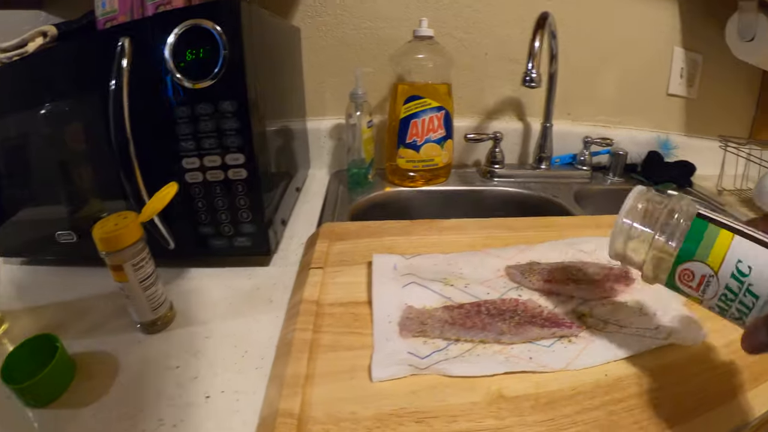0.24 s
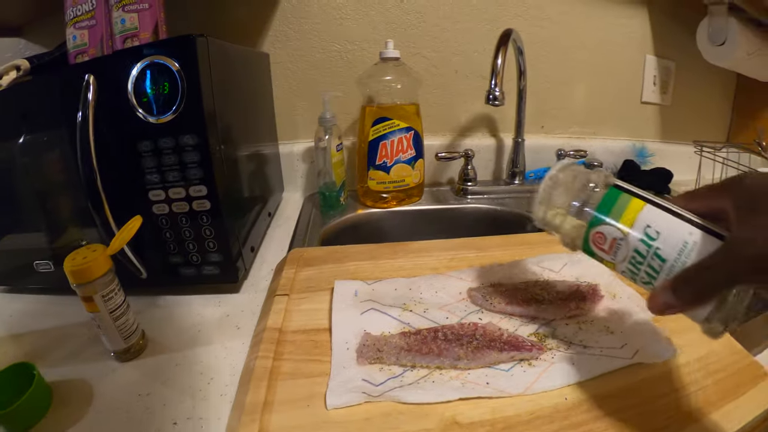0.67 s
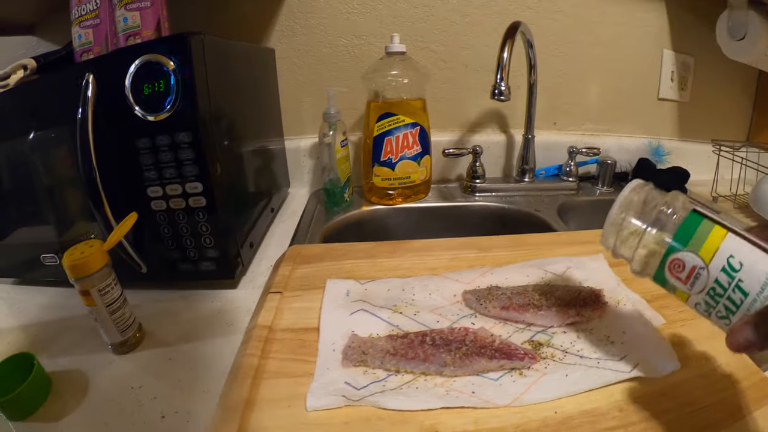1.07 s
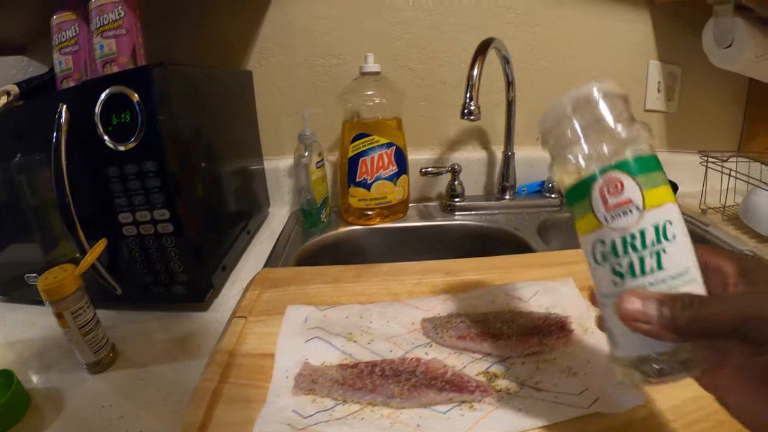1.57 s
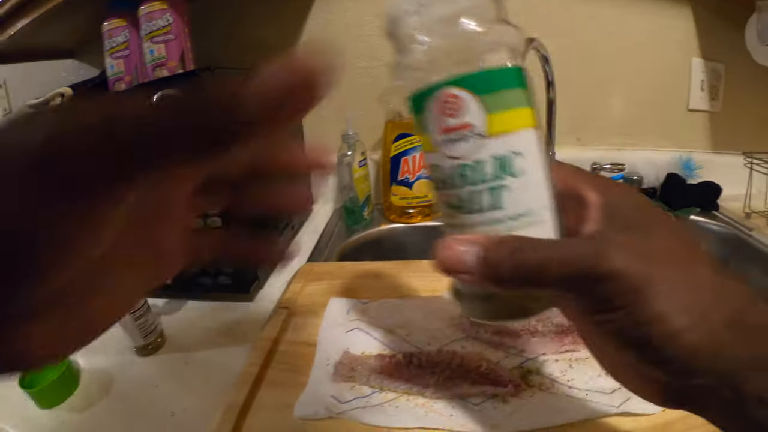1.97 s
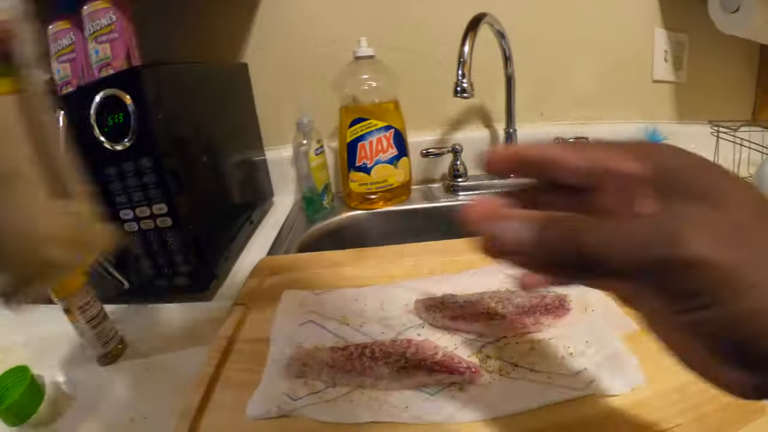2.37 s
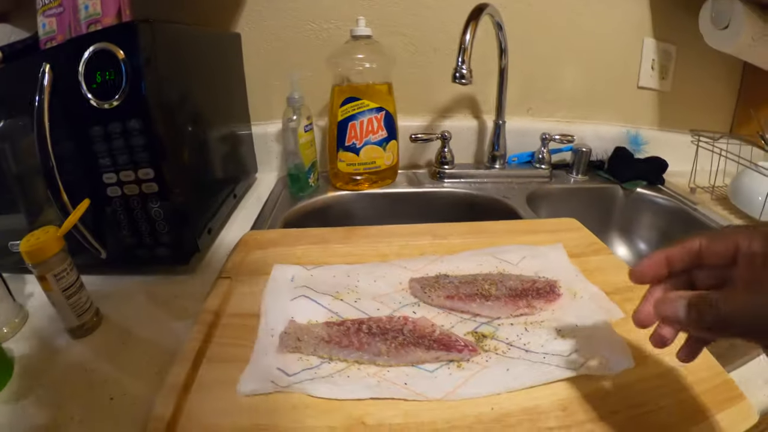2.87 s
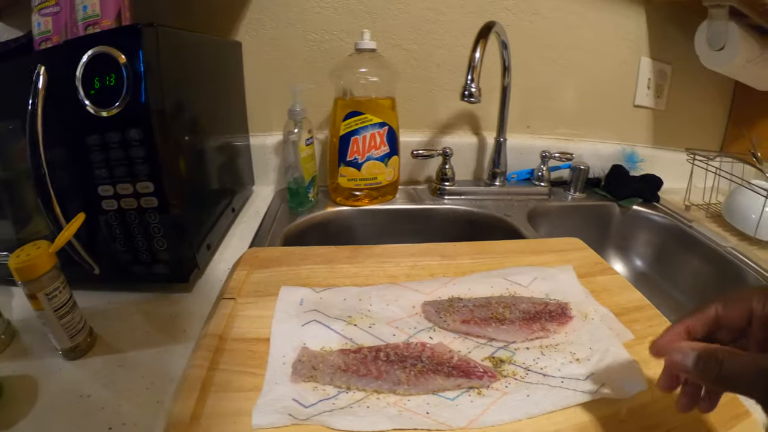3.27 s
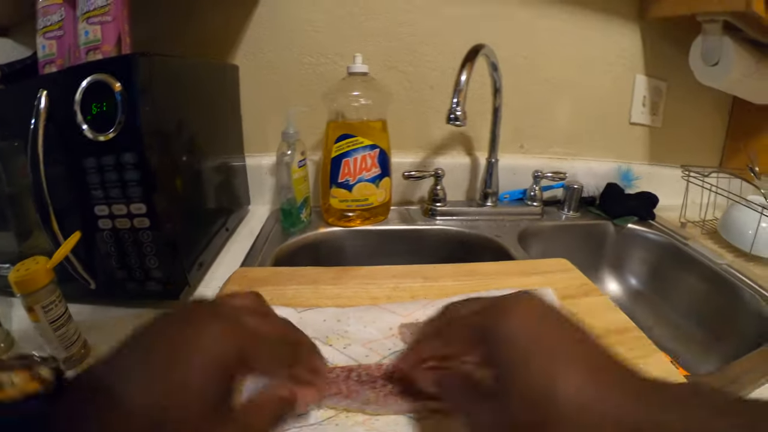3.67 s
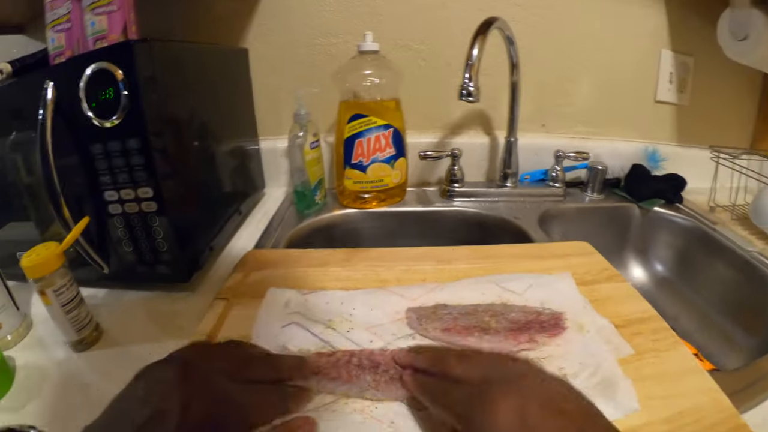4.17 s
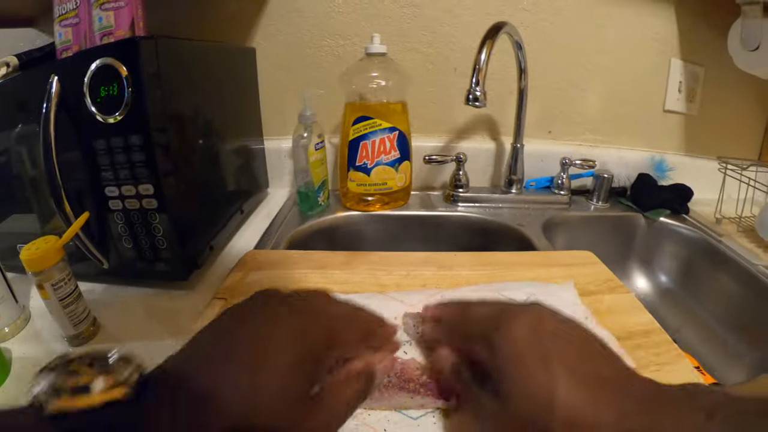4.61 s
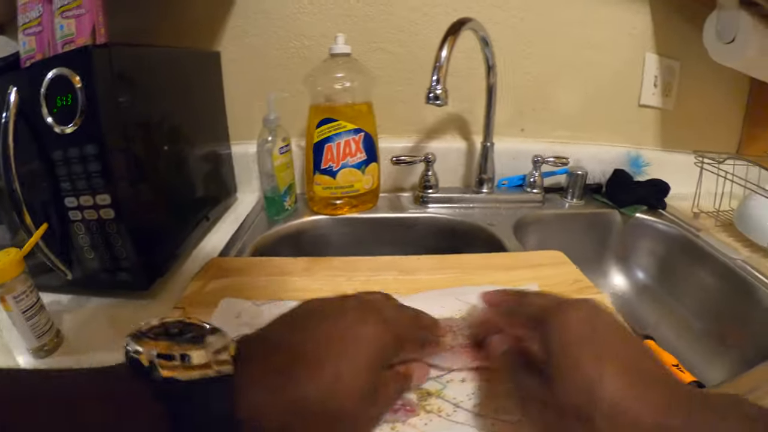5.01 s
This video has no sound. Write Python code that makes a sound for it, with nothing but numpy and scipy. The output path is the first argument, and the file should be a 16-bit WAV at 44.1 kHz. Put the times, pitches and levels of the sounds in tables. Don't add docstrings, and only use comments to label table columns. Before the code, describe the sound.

Salt is shaken in quick soft rattles inside a plastic jar, then a hard knock on the counter, faint rubbing and a wooden thud over low hum.

```python
import sys
import numpy as np
from scipy import signal
from scipy.fft import rfft, irfft
from scipy.io import wavfile
from scipy.ndimage import uniform_filter1d

SR = 44100
rng = np.random.default_rng(int(sys.argv[2]) if len(sys.argv) > 2 else 0)


def dump_mix(stems):
    frames = np.atleast_2d(stems).T
    limited = np.clip(frames, -1, 1)
    pcm = np.round(limited * 32767).astype(np.int16)
    wavfile.write(sys.argv[1], SR, pcm)


def invert_db(x):
    u = np.asarray(x, float) / 20
    return 10 ** u


N = 231436
HZ = np.maximum(np.arange(N // 2 + 1) * SR / N, 1.)
T = np.arange(N) / SR


def read(table):
    hz, value = np.transpose(table)
    return np.interp(np.log(HZ), np.log(hz), value)


def shape(x, gain):
    y = irfft(rfft(x, axis=-1) * gain, N, axis=-1)
    return y / np.sqrt(np.mean(y ** 2))


def colour(x, gain):
    return irfft(rfft(x) * gain / np.sqrt(np.mean(gain ** 2)), N)


def peaks(table):
    power = 0
    for hz, width, db in table:
        power = power + invert_db(2 * db) / (1 + (2 * (HZ - hz) / width) ** 2) ** 2
    return np.sqrt(power)


def pair(like, grain_db=0.):
    grain_size = np.minimum(rng.exponential(size=N), 4)
    mid, side = rng.standard_normal((2, N)) * invert_db(grain_db * grain_size)
    likeness = np.clip(read(like), -.99, .99)
    mid = rfft(mid) * np.sqrt(1 + likeness)
    side = rfft(side) * np.sqrt(1 - likeness)
    return irfft(np.array([mid + side, mid - side]), N) / 2


def pan(db):
    return invert_db(np.array([db, -db]) / 2)


def walk(rate):
    k = int(SR / rate)
    held = np.repeat(rng.standard_normal(N // k + 1), k)
    return 1.3 * uniform_filter1d(uniform_filter1d(held, k), k)[:N]


def wander(hz, spread_hz, rate):
    return np.sqrt(2) * np.sin(2 * np.pi * np.cumsum(hz + spread_hz * walk(rate)) / SR)


def swell(s, before, after, order=2):
    return np.exp(-((T - s) / np.where(T < s, before, after)) ** order)


def burst(s, t60):
    return (T >= s) * np.exp(-np.log(1000) * np.maximum(T - s, 0) / t60)


def ring(s, hz, t60, build=0.086):
    age = np.maximum(T - s, 0)
    decay = np.exp(-np.log(1000) * age / t60)
    return np.sin(2 * np.pi * hz * age) * decay * (1 - np.exp(-age * hz / build))


def convolve(x, response):
    return signal.fftconvolve(np.atleast_2d(x), np.atleast_2d(response), axes=-1)[:, :N]


def patchy(x, spread_db, rate):
    spectrum, out = rfft(x), 0
    place = np.clip(3 * np.log2(HZ / 2000), 0, 9)
    for k in range(10):
        band = irfft(spectrum * np.clip(1 - abs(place - k), 0, 1), N)
        out = out + band * invert_db(spread_db * walk(rate))
    return out


# frequency in Hz, then level in dB at the start, middle and end.
MOTOR_LINES = [(532, -80, -80, -73), (594, -66, -77, -76), (888, -73, -75, -76), (1540, -83, -83, -83),
               (5566, -90, -89, -101)]


def whine():
    out = 0
    for hz, *levels_db in MOTOR_LINES:
        level_db = np.interp(T, [0, T[-1] / 2, T[-1]], levels_db)
        out = out + invert_db(level_db) * wander(hz, 1., 3)
    return out


# peak in seconds, level in dB.
FLARES = [(.09, -60), (.23, -61), (.4, -57), (.53, -60.5), (.67, -56), (.79, -57.5), (1.15, -64),
          (1.33, -57.5), (1.45, -59), (1.86, -57), (1.99, -56.5), (2.2, -57), (2.42, -58.5), (2.63, -58),
          (2.82, -68), (3.31, -69), (3.45, -60.5), (3.9, -66), (4.38, -65), (4.7, -64), (4.85, -62),
          (5.11, -64)]


def whistle_level():
    flares = sum(invert_db(2 * db) * swell(s, 0.027, 0.027) for s, db in FLARES)
    rest_db, swing_db = -67, 2
    return np.sqrt(invert_db(2 * rest_db) + flares) * invert_db(swing_db * walk(21.97))


# frequency in Hz, level in dB per Hz.
AIR = [(15, -28), (25, -29.5), (106, -22.5), (167, -4.5), (219, -6), (293, -2.5), (427, -9.5), (573, -15),
       (691, -10.5), (1000, -23.5), (1500, -19), (2240, -37.5), (7090, -43.5), (10300, -55), (15000, -62)]
# frequency in Hz, likeness of left and right (-1 to 1).
AIR_LIKE = [(60, 0.9), (130, 0.49), (290, 1), (640, 0.33), (1400, -0.46), (3090, 0.64), (6800, -0.11),
            (15000, -0.19)]
# frequency in Hz, width in Hz, level in dB.
HUM_BANDS = [(58.9, 3.2, -64), (117.1, 4.3, -64.5), (146, 7, -68.5), (184.1, 3.8, -60), (254.9, 5.5, -61),
             (321.5, 18, -64), (371.4, 11, -62.5), (462, 15, -68), (510, 3.2, -73.5), (600, 52, -74.5)]
# peak in seconds, level in dB.
GUSTS = [(.33, -57), (.52, -53), (.7, -51.5), (1.22, -52), (1.39, -64), (1.6, -50), (1.86, -51.5),
         (2.02, -57.5), (2.2, -56.5), (2.34, -53), (2.64, -52.5), (2.82, -51.5), (3.154, -52),
         (3.35, -54.5), (3.6, -55), (3.96, -50), (4.12, -57.5), (4.48, -50.5), (4.89, -54.5),
         (5.146, -56.5), (5.25, -53.5)]


def hum():
    air = shape(pair(AIR_LIKE), invert_db(read(AIR))) * invert_db(-49 - 4.5 + 0.19 * walk(3.7))
    source = pair(AIR_LIKE)
    bands = sum(invert_db(db) * shape(source, peaks([(hz, width, 0)])) for hz, width, db in HUM_BANDS)
    gust_power = sum(invert_db(2 * db) * swell(s, 0.06, 0.06) for s, db in GUSTS)
    rest_db, low_hz, high_hz = -70.5, 294, 694
    low = np.sqrt(invert_db(2 * rest_db) + gust_power) * wander(low_hz, 8.93, 30)
    high = whistle_level() * wander(high_hz, 6.5, 30) * pan(-1.9)[:, None]
    return air + low + high + whine() + bands


# peak in seconds, level in dB,
# ring of the jar bottom in dB, ring of the jar wall in dB (both relative to the stroke).
STROKES = [(.076, -65, -7, -11), (.148, -63, -8, -15), (.227, -60, -0.5, -10), (.315, -53, -1, -3),
           (.389, -56.5, -7, -5), (.469, -59, -5, -4), (0.547, -57.5, -3, -2), (.621, -56, 3, -9),
           (0.693, -52, -6, -6), (.805, -68, -2, -5), (.942, -56, -4, -2.5), (1.008, -59.5, -1, -5),
           (1.095, -57.5, -9, -4), (1.173, -64, -2, -7), (1.253, -61, -8, -7), (1.335, -66.5, -15, 2.5)]
# frequency in Hz, level in dB per Hz.
SALT = [(530, -22), (900, 4), (943, -9.5), (1020, 4), (1700, -6), (2600, -4), (3290, -5), (7580, -1.5),
        (10200, -8), (11600, -17), (13700, -21), (14500, -22.5), (15000, -54)]
# frequency in Hz, likeness of left and right (-1 to 1).
SALT_LIKE = [(60, 0.79), (130, 0.73), (290, 0.92), (640, -0.46), (1400, -0.35), (3090, 0.79), (6800, -0.11),
             (15000, -0.29)]
# frequency in Hz, width in Hz, level in dB.
JAR_BOTTOM = [(1650, 250, -9), (3480, 330, 0)]
# frequency in Hz, width in Hz, level in dB.
JAR_WALL = [(6200, 500, 0), (7800, 350, -1)]


def shaken_salt():
    spray = shape(pair(SALT_LIKE, grain_db=4.0), invert_db(read(SALT)))
    bottom = shape(pair(SALT_LIKE, grain_db=4.0), peaks(JAR_BOTTOM))
    wall = shape(pair(SALT_LIKE, grain_db=4.0), peaks(JAR_WALL))
    trickle = invert_db(2 * -74.) * (T < 1.4)
    jump = (invert_db(-47) * burst(2.861, 0.35)) ** 2
    power, bottom_power, wall_power = trickle + jump, 0, 0
    rise_s, fall_s, bottom_s, wall_s = 0.022, 0.021, .013, 0.022
    for s, db, bottom_db, wall_db in STROKES:
        power = power + invert_db(2 * db) * swell(s, rise_s, fall_s)
        bottom_bump = swell(s - .006, bottom_s, bottom_s)
        bottom_power = bottom_power + invert_db(2 * (db + bottom_db - 7.5)) * bottom_bump
        wall_power = wall_power + invert_db(2 * (db + wall_db - 4.0)) * swell(s, wall_s, wall_s)
    grains = patchy(spray, 1.5, 22.07) * np.sqrt(power)
    jar = bottom * np.sqrt(bottom_power) + wall * np.sqrt(wall_power)
    return (grains + jar) * pan(-1.8)[:, None]


# peak in seconds, half length in seconds,
# deep rumble in dB, upper rumble in dB.
MOUNT = [(.07, 0.096, -49, -60), (0.365, 0.084, -48.5, -57), (0.674, 0.077, -49.5, -51),
         (0.785, 0.034, -48, -57), (0.888, 0.046, -41.5, -52), (.99, 0.03, -43, -53),
         (1.2, 0.087, -47, -54), (1.35, 0.058, -51, -53), (1.587, 0.087, -57.5, -64),
         (2.01, 0.086, -64, -54), (2.288, 0.075, -48.5, -50), (2.39, .04, -50.5, -60),
         (2.785, 0.12, -53, -58), (3.147, 0.12, -63, -60), (3.584, 0.073, -64, -66),
         (4.097, 0.064, -62.5, -63), (4.383, 0.04, -66, -73), (4.51, .05, -75, -64),
         (4.82, 0.064, -66.5, -57)]


def mount():
    deep = wander(29., 5.15, 12) * pan(-0.42)[:, None]
    upper = shape(pair([(20, 0.8), (200, 1.0)]), peaks([(73.0, 79, 0)])) * invert_db(0.68 * walk(26))
    deep_power, upper_power = invert_db(2 * -76), invert_db(2 * -70)
    for s, half, deep_db, upper_db in MOUNT:
        deep_power = deep_power + invert_db(2 * deep_db) * swell(s, half, half, order=4)
        upper_power = upper_power + invert_db(2 * upper_db) * swell(s, half, half)
    return deep * np.sqrt(deep_power) + upper * np.sqrt(upper_power)


# start in seconds, peak in dB, ring in Hz, ring width in Hz, left minus right in dB.
TICKS = [(0.76, -52, 5200, 400, 3), (.761, -42, 10400, 4000, 6), (.7795, -55, 7800, 900, 1.1),
         (.78, -53, 11000, 3000, 3), (.321, -45, 7000, 3000, -1.5), (.326, -50, 3200, 2500, -1.5),
         (.372, -50, 8000, 4000, -1.5), (1.521, -40, 2700, 900, -8), (2.053, -45.5, 6800, 900, -1.5),
         (2.0535, -50, 11000, 5000, -1.5), (2.061, -53, 9000, 6000, -1.5), (2.333, -48, 9000, 6000, 1.5),
         (2.111, -56, 3470, 900, -3), (2.133, -46, 3260, 900, 0), (2.152, -36.5, 2880, 805, 1.1),
         (2.1522, -32, 7400, 2500, -1), (2.185, -46, 3240, 700, .1), (2.222, -44, 6540, 1500, -2),
         (2.5715, -53, 2370, 900, -3), (3.2125, -57, 3780, 1500, -6), (3.331, -52.5, 7300, 700, 1.1),
         (3.3312, -57, 6200, 600, 1.1), (3.332, -53.5, 2150, 500, 3), (4.0745, -56, 9900, 1500, -1.1),
         (4.55, -24, 7640, 1460, 2), (4.5501, -38, 5300, 1600, 6), (4.5503, -52.5, 3400, 900, 2),
         (4.5502, -48.5, 12600, 1500, 3.5), (4.5575, -41.5, 8100, 900, 1.5), (4.578, -52, 6900, 900, 2),
         (4.594, -46.5, 2120, 700, 8.5), (4.5935, -42.5, 7550, 600, 1), (5.037, -52, 2560, 900, 0),
         (5.201, -56, 4830, 900, 7), (5.2275, -54, 4810, 350, 1.1), (5.229, -54, 2600, 500, 3)]
# start in seconds, level in dB, frequency in Hz, ring time in seconds.
THUMPS = [
    (2.152, -39.5, 1030, 0.016),
    (2.1581, -27, 123, 0.04),
    (3.33, -45, 865, 0.018),
    (4.5925, -42.5, 760, 0.012),
]


def ticks():
    out, noise = 0, pair(SALT_LIKE)
    for s, db, hz, width, pan_db in TICKS:
        snap = invert_db(-10.5) * colour(noise * burst(s, .0022), peaks([(8000, 14000, 0)]))
        rattle_gain = peaks([(hz, width, 0), (6000, 9000, -20)])
        rattle = invert_db(-18) * colour(noise * burst(s + 0.00087, 0.062), rattle_gain)
        click = ring(s, hz, 6.2 / width, build=0.65) + snap + rattle
        out = out + invert_db(db) * click * pan(pan_db)[:, None]
    return out + sum(invert_db(db) * ring(s, hz, t60) for s, db, hz, t60 in THUMPS)


# peak in seconds, level in dB, frequency in Hz, width in Hz,
# half length in seconds.
SCUFFS = [
    (0.682, -59, 1600, 300, 0.021),
    (2.3, -73, 2290, 500, 0.11),
    (2.605, -61.5, 1370, 450, 0.11),
    (3.286, -61, 1050, 600, 0.046),
    (3.686, -62.5, 1330, 398, 0.073),
    (4.894, -58, 1390, 600, 0.011),
]


def scuffs():
    skin, out = pair(SALT_LIKE, grain_db=1.0), 0
    for s, db, hz, width, half in SCUFFS:
        out = out + invert_db(db) * swell(s, half, half) ** 1 * shape(skin, peaks([(hz, width, 0)]))
    return out


def strokes_of(table, rise, pan_db):
    dull = bright = invert_db(2 * -83)
    for s, hold, db, fade, tilt_db in table:
        away = np.maximum(np.maximum((s - T) / rise, T - s - hold), 0)
        level_db = db - 20 * away / fade
        dull = dull + invert_db(2 * level_db - tilt_db)
        bright = bright + invert_db(2 * level_db + tilt_db)
    return np.array([dull, bright])[:, None] * pan(pan_db)[:, None] ** 2


# full level in seconds, hold in seconds,
# level in dB, seconds to fade 20 dB, treble minus middle in dB.
SLIDES = [
    (1.416, 0.22, -52.5, 0.12, -1.2),
    (1.758, 0.055, -52.5, .2, -2),
    (1.91, 0.029, -49.5, 0.1452, 6.5),
    (2.054, .004, -65.5, 0.04, 10),
    (2.115, 0.049, -58.5, 0.01, -6),
    (2.182, 0.011, -54.5, 0.05, -9),
    (2.25, 0.027, -56.5, 0.12, -6.5),
    (2.36, 0.014, -50, 0.1, 4),
    (2.57, 0.034, -68.5, 0.17, -12),
    (2.845, 0.0099, -71.5, .02, -9),
]
# full level in seconds, hold in seconds, level in dB,
# seconds to fade 20 dB, treble minus middle in dB.
RUBS = [(3.21, 0.096, -74.5, 0.12, -18), (3.62, .13, -72, 0.15, -2), (3.88, .008, -69.5, .1, -3),
        (4.078, .008, -68, 0.096, -3), (4.245, .03, -63, 0.068, -6.5), (4.434, .005, -74, .07, -10),
        (4.53, .01, -72, 0.035, 5), (4.55, .08, -66.5, .04, -1), (4.77, 0.0067, -70.5, 0.098, -11.5),
        (4.897, .012, -64.5, 0.026, -8.5), (4.92, .11, -78.5, 0.094, -11.5),
        (5.116, .008, -65.5, 0.075, -9), (5.2, 0.018, -73, 0.13, -15)]


def rubbing():
    grains = patchy(shape(pair(SALT_LIKE, grain_db=1.8), invert_db(read(SALT))), 2.2, 45)
    bright = 1 / (1 + (4800 / HZ) ** 4)
    dull = (1 - bright) / np.sqrt(1 + (1500 / HZ) ** 4)
    power = strokes_of(SLIDES, 0.74, -1.3) + strokes_of(RUBS, 0.66, -2)
    dull_gain, bright_gain = np.sqrt(power)
    dull_part = irfft(rfft(grains) * dull, N) * invert_db(1.3 * walk(25.34))
    bright_part = irfft(rfft(grains) * bright, N) * invert_db(0.31 * walk(25.65))
    return dull_part * dull_gain + bright_part * bright_gain


# frequency in Hz, likeness of left and right (-1 to 1).
KITCHEN_LIKE = [(60, 1.0), (130, 0.91), (290, 0.99), (640, 0.54), (1400, 0.33), (3090, 0.57), (6800, 0.66),
                (15000, -0.44)]


def knock(blows, modes, build, crack, crack_db, crack_t60, rattle_db, side_hz, side_db):
    body = 0
    for k, (hz, db, t60) in enumerate(modes):
        lean = pan(side_db / (1 + (side_hz / hz) ** 4))[:, None]
        body = body + (-1) ** k * invert_db(db) * ring(0, hz, t60, build) * lean
    push, strike = 0, 0
    for s, db, ms in blows:
        width = ms / 1000
        pulse = np.sin(np.pi * np.clip((T - s) / width, 0, 1)) ** 2
        push = push + invert_db(db) * pulse * 2 / (width * SR)
        strike = strike + invert_db(db) / ms * (burst(s, crack_t60) + invert_db(rattle_db) * burst(s, 0.19))
    crack_noise = invert_db(crack_db) * colour(strike * pair(KITCHEN_LIKE), invert_db(read(crack)))
    return convolve(push, body), crack_noise


# start in seconds, level in dB, contact in milliseconds.
JAR_DOWN = [
    (2.8592, -14, 0.49),
    (2.8705, -34, 1.2),
    (2.882, -28, 1.5),
    (2.905, -32, 1.26),
    (2.975, -31, 2.8),
]
# frequency in Hz, level in dB, ring time in seconds.
COUNTER = [(70.7, -7.5, 0.36), (97.7, -12, 0.33), (190.3, -3.5, 0.18), (251, -13, 0.43), (287, -1, 0.14),
           (381.5, -15.5, 0.31), (453, -16, 0.22), (474, 0.5, 0.04), (525, -24, 0.1), (574, -11.5, 0.15),
           (670, -17, 0.04), (859, -21, 0.15), (1055, -9.5, 0.045), (1545, -19.5, 0.21), (2290, -25, .08),
           (3400, -25, .04), (4600, -32, .008)]
# frequency in Hz, level in dB per Hz.
JAR_CRACK = [(290, -16.5), (500, -5.5), (1320, -19.5), (2330, -18.5), (2880, -28), (3460, -29),
             (5010, -38.5), (7680, -37.5), (10400, -44.5), (15000, -83)]


def jar_on_counter():
    return knock(JAR_DOWN, COUNTER, 0.59, JAR_CRACK, crack_db=-8.5, crack_t60=0.011, rattle_db=-8.5,
                 side_hz=900, side_db=6.0)


# start in seconds, level in dB, contact in milliseconds.
BOARD_ROCKS = [
    (4.900, -28, 1.9),
    (4.9197, -8, 1.66),
    (4.944, -25.5, 1.28),
    (4.96, -26.5, 1.2),
    (4.971, -24, 1.4),
    (5.02, -34, 4.8),
    (5.028, -36, 0.99),
]
# frequency in Hz, level in dB, ring time in seconds.
BOARD = [(70.5, -18.5, 0.27), (111.6, -17, 0.24), (155.4, -9.5, 0.11), (190, -11, 0.19), (216, 4, 0.087),
         (319, -18.5, 0.15), (347.7, -26.5, 0.4), (491, -23.5, 0.34), (566, -17.5, 0.2), (645, -24, 0.12),
         (748, -28, 0.1), (865, -27.5, 0.25), (1070, -36.5, .15), (1364, -16.5, 0.16), (2040, -28, .1),
         (3400, -40, .05)]
# frequency in Hz, level in dB per Hz.
BOARD_CRACK = [(290, -11.5), (500, 0.5), (688, -2.5), (959, -11.5), (2130, -14), (2600, -22.5), (2890, -30),
               (3390, -30), (4090, -46.5), (6340, -43.5), (12000, -72.5), (15600, -104), (22000, -120)]


def rocking_board():
    return knock(BOARD_ROCKS, BOARD, 0.58, BOARD_CRACK, crack_db=-16.5, crack_t60=0.079, rattle_db=-10,
                 side_hz=420, side_db=-5.5)


# frequency in Hz, reverberation time in seconds.
KITCHEN = [(60, 0.51), (300, 0.18), (1000, 0.58), (3000, 0.56), (8000, 0.5), (14000, 0.45)]


def kitchen():
    noise, tail = rfft(pair(KITCHEN_LIKE)), 0
    room_hz, room_t60 = np.transpose(KITCHEN)
    for hz in 60 * 2. ** np.arange(9):
        band = irfft(noise * np.clip(1 - abs(np.log2(HZ / hz)), 0, 1), N)[:, :SR]
        t60 = np.interp(np.log(hz), np.log(room_hz), room_t60)
        tail = tail + band * np.exp(-np.log(1000) * T[:SR] / t60) / np.sqrt(t60)
    tail = tail * np.clip(T[:SR] / 0.00099, 0, 1)
    return tail / np.sqrt(np.sum(tail ** 2) / 2)


def scene():
    jar, jar_crack = jar_on_counter()
    board, board_crack = rocking_board()
    bodies = jar + board
    cracks = jar_crack * pan(4.3)[:, None] + board_crack
    clicks = ticks()
    soft = shaken_salt() + rubbing() + scuffs()
    wet = invert_db(-11) * bodies.mean(axis=0) + invert_db(-7.0) * cracks.mean(axis=0)
    wet = wet + invert_db(-15.5) * clicks.mean(axis=0) + invert_db(-11.0) * soft.mean(axis=0)
    return bodies + cracks + clicks + soft + convolve(wet, kitchen()) + hum() + mount()


def band_limit(x):
    return signal.sosfilt(signal.butter(12, 15550, fs=SR, output="sos"), x)


def record(dry):
    mix = irfft(rfft(dry) / np.sqrt(1 + (HZ / 14300) ** 40), N)
    return band_limit(mix)


dry = scene()
out = record(dry)
dump_mix(out)
```